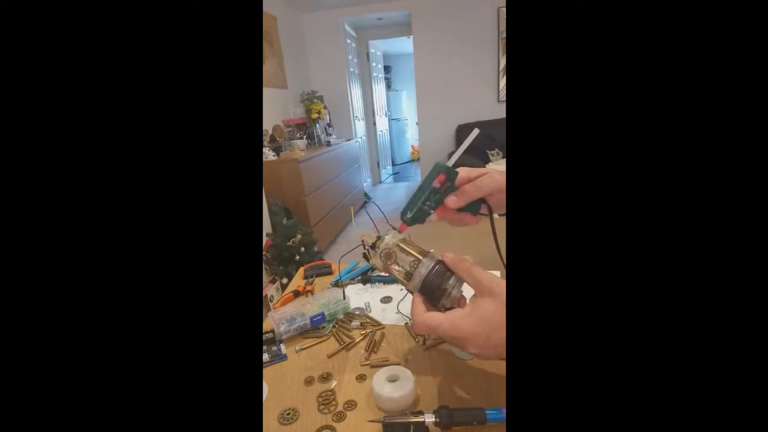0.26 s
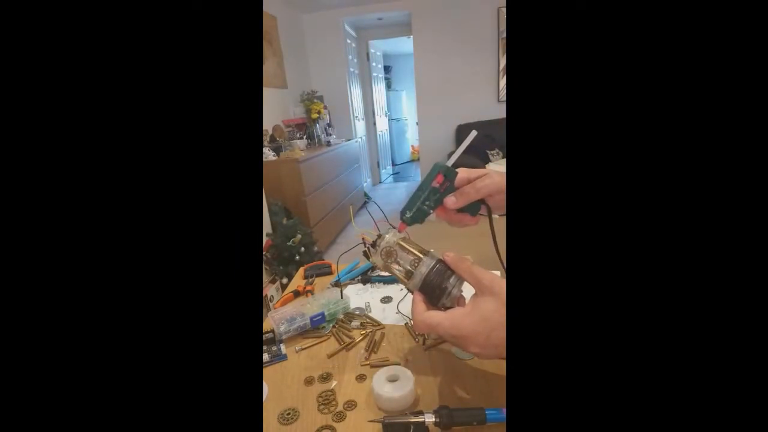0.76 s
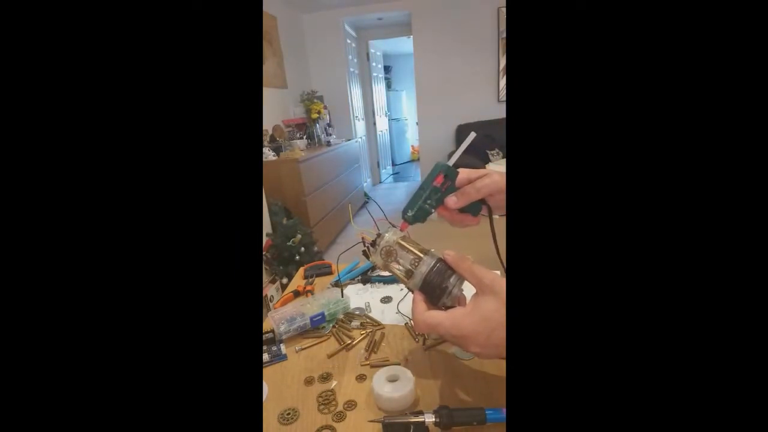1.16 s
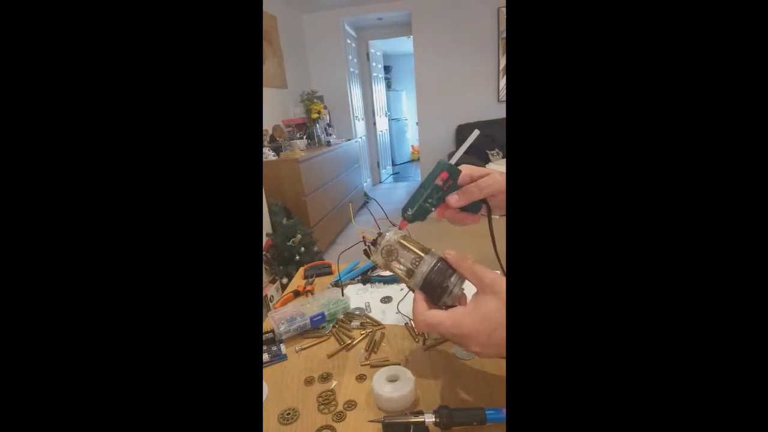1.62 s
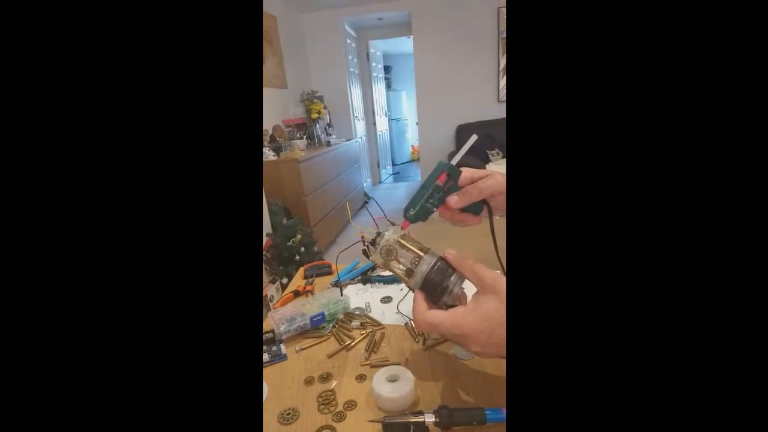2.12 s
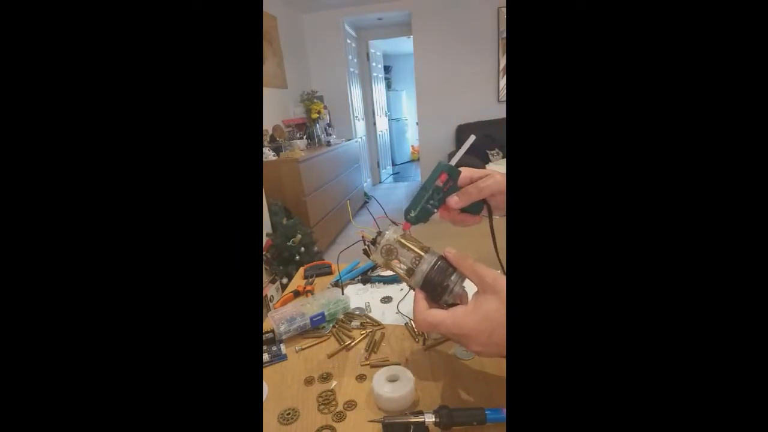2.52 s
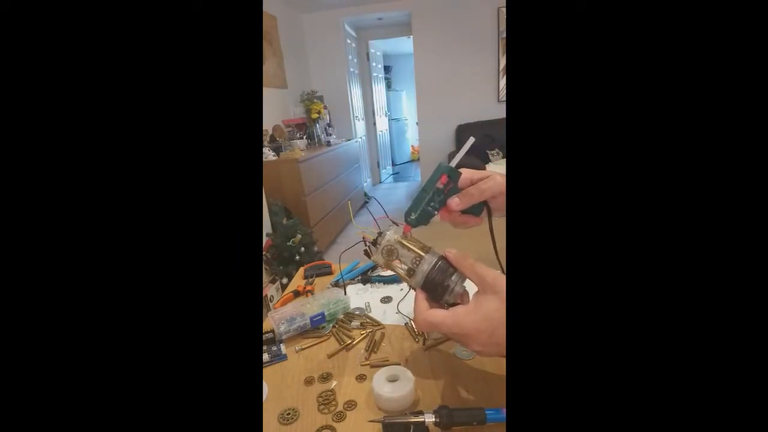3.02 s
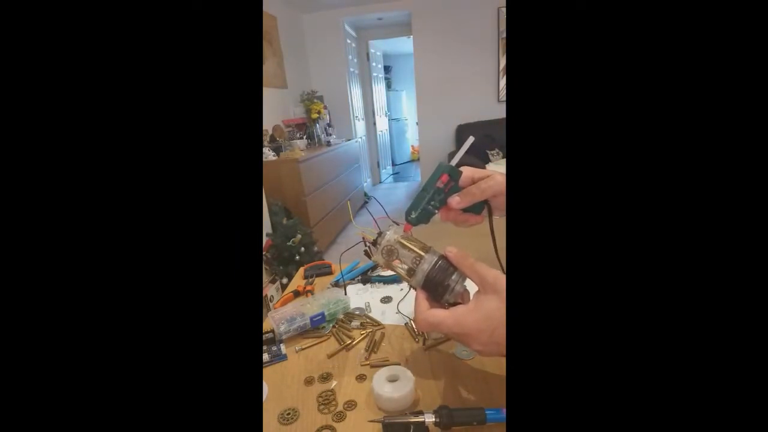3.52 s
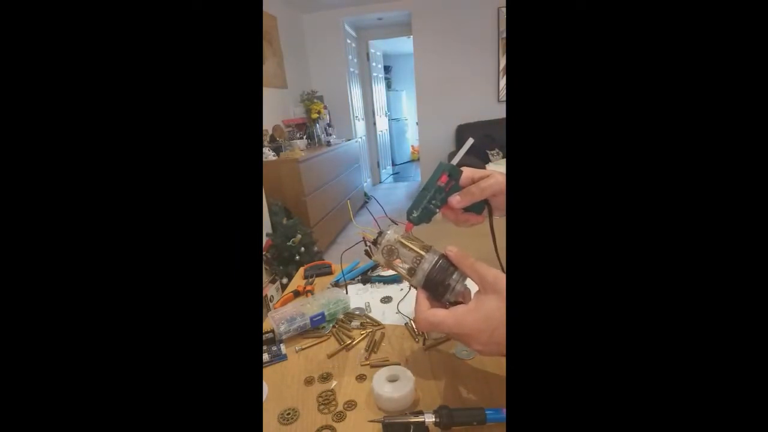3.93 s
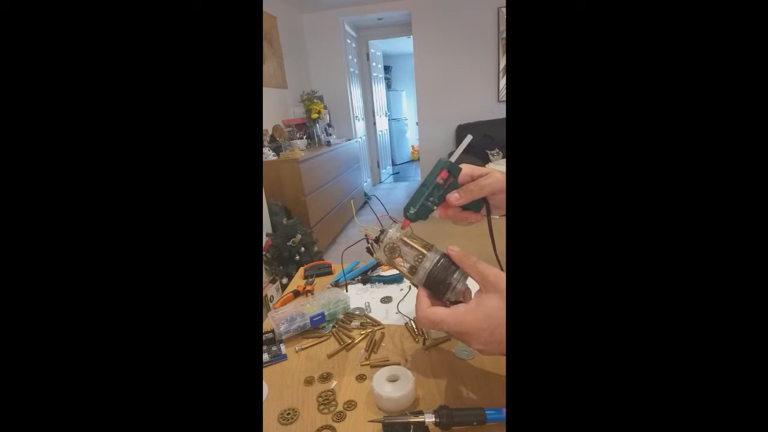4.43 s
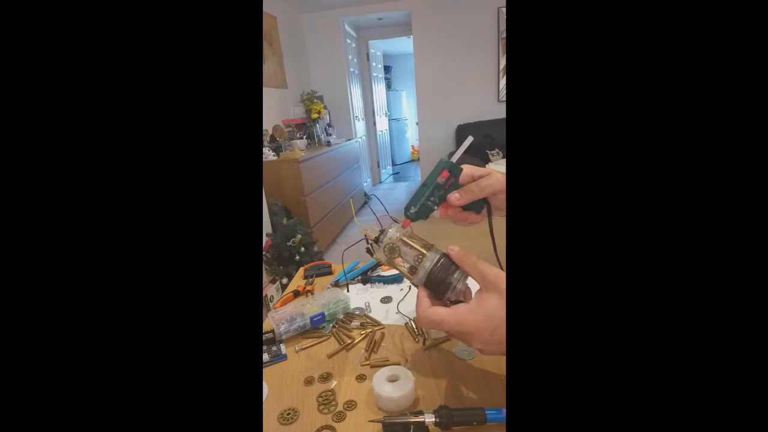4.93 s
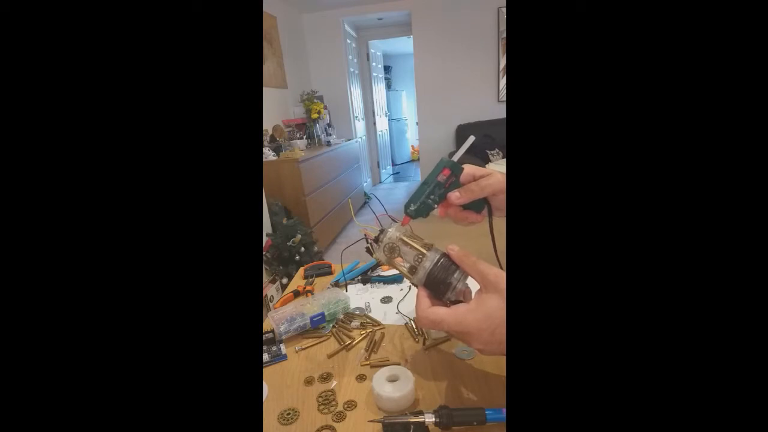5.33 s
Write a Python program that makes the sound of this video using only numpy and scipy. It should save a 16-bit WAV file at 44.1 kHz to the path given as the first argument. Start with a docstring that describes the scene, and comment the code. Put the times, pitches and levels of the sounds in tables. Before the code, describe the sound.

Close, dry, bright creaking and raspy clicking of a squeezed hot glue gun trigger, in seven uneven bursts over a faint quiet room murmur.

```python
"""A quiet room murmurs and a grip settles with two light knocks; then a hot glue gun is squeezed repeatedly.
Its trigger sticks and slips: impulses at a changing rate make scratchy creaks, which break up into single ticks.
Each slip drives damped sines (the plastic shell) and bursts of filtered noise (scratch, hiss, rasp, low body).
Noise bursts make the soft clacks of the trigger let go; sparse echoes add a short room tail in stereo."""
import sys
import numpy as np
from scipy import signal
from scipy.fft import rfft, irfft
from scipy.io import wavfile

SR = 44100
rng = np.random.default_rng(int(sys.argv[2]) if len(sys.argv) > 2 else 0)


def output_pcm(signal):
    """Save a mono or channel-first signal as 16-bit PCM at the path in sys.argv[1].

    Samples are clipped to [-1, 1] before scaling.
    """
    pcm = np.clip(np.atleast_2d(signal).T, -1, 1) * 32767
    wavfile.write(sys.argv[1], SR, np.round(pcm).astype(np.int16))


N = 245630
TIME, HZ = np.arange(N) / SR, np.fft.rfftfreq(N, 1 / SR)

# All noise spectra are relative: colour() or evened() sets their overall power.
# Steady air noise of the room: frequency_hz, relative_density_db
AIR_SPECTRUM = [(25, -15.5), (45, -12.5), (62, -7.5), (82, -6.5), (100, -3.5), (160, 0.5), (310, -7.5),
                (400, -14.5), (700, -14), (1050, -20), (1350, -17.5), (1630, -4.5), (2000, -18.5),
                (2450, -27), (6000, -30), (12500, -29), (15500, -29)]
# Light knocks of the grip settling: start_s, level_db (before the attack), decay_s
GRIP_KNOCKS = [(.0205, -46.5, 0.0074), (.034, -53, 0.007)]
# Spectrum of the grip's knock: frequency_hz, relative_density_db
KNOCK_SPECTRUM = [(700, -23), (1300, -10), (1650, 8.5), (2300, -17), (3000, -23), (3900, -24), (4550, -8),
                  (5100, -16), (6000, -37)]
# Squeezes of the trigger: start_s, full_slip_level_db, extra_rubbing_at_start_db
TRIGGER_SQUEEZES = [(0.201, -34, 13.5), (1.723, -33.5, 17), (2.465, -34, 17.5), (2.955, -35, 18),
                    (3.56, -34.5, 18.5), (4.11, -35.5, 14), (4.589, -34.5, 22)]
# Lone ticks, where the trigger gives once and sticks again: time_s, level_db
LONE_TICKS = [(0.2104, -42.5), (.231, -39), (0.613, -31), (0.8524, -34.5), (1.2592, -43), (2.0305, -34),
              (2.178, -34), (2.6578, -32.5), (2.715, -43), (3.2539, -33.5), (3.7358, -32.5),
              (3.7725, -33.5), (3.8168, -36), (3.8397, -36), (3.8593, -35.5), (4.0266, -39.5),
              (4.1054, -39.5), (4.1257, -35), (4.1424, -34)]
# Creaks, one curve for each unbroken run of sticking and slipping: time_s, rate_slips_per_s
CREAK_RATES = [
    [(0.253, 136.0), (0.317, 117.0), (0.368, 149.0), (0.406, 36.9), (0.468, 50.2), (0.505, 86.5),
     (0.576, 69.4)],
    [(0.67, 47.0), (0.784, 61.8)],
    [(0.887, 14.9), (0.924, 56.1), (0.991, 98.2), (1.101, 60.2), (1.188, 85.3), (1.2, 73.5), (1.254, 64.3)],
    [(1.726, 226), (1.749, 237.0), (1.766, 150), (1.817, 245), (1.903, 94.5), (1.929, 118), (1.961, 61.6),
     (2.006, 69.4)],
    [(2.071, 35.2), (2.095, 53.9), (2.149, 60.4)],
    [(2.464, 191.0), (2.476, 147.0), (2.532, 224.0), (2.576, 149.0), (2.637, 67.2)],
    [(2.953, 212.0), (2.993, 241.0), (3.036, 181.0), (3.102, 46.8), (3.166, 91.4), (3.228, 38.7)],
    [(3.562, 225.0), (3.603, 224.0), (3.608, 282.0), (3.646, 150.0), (3.71, 56.0)],
    [(4.587, 153.0), (4.662, 168.0), (4.667, 271.0), (4.708, 85.1), (4.733, 52.4)],
]
# Strain late in the first squeeze; end values hold outside it: time_s, extra_rubbing_db, groan_gain_db
SHELL_STRAIN = [(.92, -2.5, -36), (1.02, 5.5, -28), (1.25, 11, -19), (1.3, -5, -47.5)]
# Ringing modes of the shell, before detuning: frequency_hz, relative_level_db
SHELL_MODES = [(4560, -5.5), (4850, -2), (5130, -10), (7200, 1), (7740, 4.5), (8190, -1.5), (8450, -6.5),
               (9130, 1.5), (9500, -6), (10880, -7), (12400, -6)]
# Low resonances of the microphone, heard as the body of the creak:
# frequency_hz, width_hz (full, at a quarter of peak amplitude), relative_level_db
BODY_RESONANCES = [(1613, 213, 4.5), (1827, 480, 1.5), (2300, 150, -15)]
# Spectrum of the sliding scratch: frequency_hz, relative_density_db
SCRATCH_SPECTRUM = [(3600, -46), (4100, -21.5), (4500, 11.5), (5100, 9), (5700, 9.5), (6200, 1), (7000, 10),
                    (7750, 11), (8500, 3.5), (9100, 9), (9900, 9.5), (10800, 14), (11500, 10), (13000, -22)]
# Spectrum of the fine friction hiss: frequency_hz, relative_density_db
FIZZ_SPECTRUM = [(5000, -38), (6500, 6.5), (8700, 0), (10500, 7), (11700, -21), (12500, 9), (13500, 7),
                 (14000, 5), (15300, 6), (15800, -16)]
# Middle resonances woken by hard rubbing: frequency_hz, relative_density_db
RASP_SPECTRUM = [(2300, -35.5), (2700, -30), (3000, -23), (3250, -21), (3600, -7), (3950, -23.5),
                 (4350, -4.5), (4650, 3.5), (5000, -5), (5500, -17.5), (6800, -33.5)]
# Note of the strained shell: frequency_hz, relative_density_db
GROAN_SPECTRUM = [(1700, -45), (2050, -7), (2300, 11.5), (2480, -13), (2700, -14.5)]
# Clacks of the trigger easing back: start_s, level_db (before the attack), decay_s
TRIGGER_CLACKS = [(1.3095, -39.5, 0.0075), (2.221, -49, 0.006), (2.2655, -43, 0.012),
                  (2.7555, -37.5, 0.0046), (3.313, -45.5, 0.0031), (3.3765, -44.5, 0.0083),
                  (3.389, -50, 0.018), (4.2405, -53.5, 0.0091), (4.275, -44, 0.0088), (4.289, -51, 0.015),
                  (4.838, -44, 0.014)]
# Spectrum of the trigger's clack: frequency_hz, relative_density_db
CLACK_SPECTRUM = [(1200, -23), (1650, 5), (2400, -25), (3900, -18.5), (4650, 6), (5600, -9.5), (6500, -8),
                  (7500, 9), (8500, -10.5), (9600, -2.5), (11000, -4), (13000, -4), (15500, -20)]
# Reverberation: frequency_hz, t60_s
ROOM_T60 = [(1500, 0.37), (4500, 0.22), (8000, 0.19), (15000, 0.12)]
# Stereo spread: frequency_hz, side_over_mid_db
STEREO_WIDTH = [(60, -17), (160, -40), (600, -24.5), (1200, -27.5), (1700, -20.5), (2050, -11.5),
                (2600, -33), (5500, -87), (7500, -40.5), (9000, -24.5), (10000, -16.5), (11500, -19.5),
                (13000, -23), (15000, -32)]
# Imbalance of the direct channels: frequency_hz, left_over_right_db
STEREO_LEAN = [(1200, 0), (1600, 2), (1900, 4.3), (2250, .3), (9200, 0), (9900, -3), (10500, 0)]

AIR_DB = -66.5  # rms level
SWELL_S, RISE_S, FALL_S = .0024, .0032, .0011  # time to a slip's peak, growth and decay constants
SOFT_START_DB, GRIP_S = -31, 0.021  # a squeeze starts this much softer and takes hold with this time constant
LEAD_S = .003  # a squeeze's settings take over this long before its start
GLIDE_RUB_DB, EASE_S = -8.5, 0.18  # rubbing eases to this level with this time constant
UNEVEN_DB = 0.28  # standard deviation of strength from slip to slip
REST_DB_PER_DOUBLING, USUAL_RATE = -0.04, 66  # per doubling of the wait; reference slips per second
DETUNE = 0.0062  # standard deviation of the shift of each mode, as a share of its frequency
EDGE_HZ = 16000  # lowpass cutoff


def gain_of(db):
    """Level law: decibels are twenty times the logarithm of amplitude."""
    return 10 ** (np.asarray(db) / 20)


def evened(x):
    """Power normalisation: scales to an rms of one."""
    return x / np.sqrt(np.mean(x ** 2) + 1e-20)


def read(points, hz):
    """Interpolation of a spectrum along a logarithmic frequency axis."""
    f, value = np.transpose(points)
    return np.interp(np.log(hz + 1), np.log(f + 1), value)


def colour(x, gain):
    """Minimum-phase filtering: log magnitude fixes phase; white noise keeps its power."""
    log_gain = np.log(np.maximum(evened(gain), 1e-5))
    circle = np.concatenate([log_gain, log_gain[-2:0:-1]])
    transfer = np.exp(np.conj(signal.hilbert(circle)))[:len(HZ)]
    response = irfft(transfer, N)
    return signal.oaconvolve(x, response[:4096])[:N]


def noise(envelope, gain):
    """Source and filter: fresh noise under an envelope rings through a spectrum."""
    return colour(envelope * rng.standard_normal(N), gain)


def shifting(x, response, turns_per_s, count=3):
    """Time-varying convolution: cyclic power-preserving fades among several drawn responses."""
    phases = [turns_per_s * TIME + k / count for k in range(count)]
    weights = np.array([np.maximum(np.cos(2 * np.pi * phase), 0) for phase in phases])
    weights /= np.linalg.norm(weights, axis=0)
    return sum(signal.oaconvolve(x * weight, response())[:N] for weight in weights)


def background(whine_hz=1220, whine_db=-85):
    """Stationary noise: spectrally shaped murmur and hiss, with one faint sinusoidal whine."""
    shaped = irfft(rfft(rng.standard_normal(N)) * gain_of(read(AIR_SPECTRUM, HZ)), N)
    air = gain_of(AIR_DB) * evened(shaped)
    whine = gain_of(whine_db) * np.sqrt(2) * np.sin(2 * np.pi * whine_hz * TIME)
    return air + whine


def rattle(events, spectrum, attack):
    """Impact of loose plastic parts: brief noise bursts with a linear attack and exponential decay."""
    envelope = np.zeros(N)
    for s, db, decay in events:
        onset = np.clip((TIME - s) / attack, 0, 1)
        envelope += gain_of(db) * onset * np.exp(-abs(TIME - s) / decay)
    return noise(envelope, gain_of(read(spectrum, HZ)))


def squeezing():
    """Exponential relaxation: slip level takes hold while hard rubbing eases, both in dB over time."""
    start, full_db, bite_db = np.transpose(TRIGGER_SQUEEZES)
    now = np.maximum(np.searchsorted(start, TIME + LEAD_S) - 1, 0)
    age = np.maximum(TIME - start[now], 0)
    level_db = full_db[now] + SOFT_START_DB * np.exp(-age / GRIP_S)
    rub_db = GLIDE_RUB_DB + bite_db[now] * np.exp(-age / EASE_S)
    return level_db, rub_db


def slip_train(level_db):
    """Stick-slip motion: one impulse a slip, at each whole turn of the integrated rate, plus lone ticks."""
    train = np.zeros(N)
    for curve in CREAK_RATES:
        s, rate = np.transpose(curve)
        turns = np.cumsum(np.interp(TIME, s, rate, left=0, right=0)) / SR
        at = np.flatnonzero(np.diff(np.ceil(turns)))
        # slower slips are very slightly weaker
        rest_db = REST_DB_PER_DOUBLING * np.log2(USUAL_RATE / np.interp(TIME[at], s, rate))
        uneven_db = UNEVEN_DB * rng.standard_normal(len(at))
        train[at] += gain_of(level_db[at] + rest_db + uneven_db)
    for s, db in LONE_TICKS:
        train[round(s * SR)] += gain_of(db)
    return train


def shell_ring(t, slide):
    """Modal excitation: detuned shell modes sound for the length of one slip."""
    modes = 0
    for hz, db in SHELL_MODES:
        shifted_hz = hz * (1 + DETUNE * rng.standard_normal())
        modes = modes + gain_of(db) * np.sin(2 * np.pi * (shifted_hz * t + rng.random()))
    return evened(slide * modes) * np.sqrt(np.mean(slide ** 2))


def spread(blows, shape):
    """Incoherent addition: the energies of blows sum, each following the shape."""
    return np.sqrt(abs(signal.oaconvolve(blows ** 2, shape ** 2)[:N]))


# each *_follow is dB of gain per dB of rubbing
def creak(ring_db=-4.0, ring_follow=0.31, scratch_db=-7.0, scratch_follow=0.4,
          body_db=-16.5, body_follow=0.6, body_decay=0.0029,
          rasp_db=-8.0, rasp_follow=1.01, fizz_db=-6.5, fizz_follow=0.42, brighten=0.74):
    """Friction-driven vibration: each slip gathers speed and stops short, ringing the shell and scratching."""
    level_db, rub_db = squeezing()
    train, t = slip_train(level_db), np.arange(SR // 50) / SR
    strain_s, strain_db, groan_db = np.transpose(SHELL_STRAIN)
    rub_db = rub_db + np.interp(TIME, strain_s, strain_db)
    slide = np.exp(np.minimum((t - SWELL_S) / RISE_S, (SWELL_S - t) / FALL_S))

    # hard rubbing trades the ring for scratch and rasp
    struck = train * gain_of(ring_db - ring_follow * rub_db)
    shell = shifting(struck, lambda: shell_ring(t, slide), turns_per_s=1.7, count=7)
    sliding = spread(train, slide)
    scratch_gain = gain_of(scratch_db + scratch_follow * rub_db)
    scratch = noise(sliding * scratch_gain, gain_of(read(SCRATCH_SPECTRUM, HZ)))
    # weak slips have less fizz, so a run brightens as it swells
    relative_strength = train / np.median(train[train > 0])
    sharp = spread(train * relative_strength ** brighten, slide)
    fizz = noise(sharp * gain_of(fizz_db + fizz_follow * rub_db), gain_of(read(FIZZ_SPECTRUM, HZ)))
    rasp = noise(sliding * gain_of(rasp_db + rasp_follow * rub_db), gain_of(read(RASP_SPECTRUM, HZ)))
    # the body and the groan die away a little more slowly
    hold = np.exp(-t / body_decay)
    held = spread(sliding, hold / np.linalg.norm(hold))
    body_gain = sum(gain_of(db) / (1 + (2 * (HZ - hz) / width) ** 2) ** 2 for hz, width, db in BODY_RESONANCES)
    body = noise(held * gain_of(body_db + body_follow * rub_db), body_gain)
    groan_gain = gain_of(np.interp(TIME, strain_s, groan_db))
    groan = noise(held * groan_gain, gain_of(read(GROAN_SPECTRUM, HZ)))
    return shell + scratch + fizz + rasp + body + groan


def reflections(early_db=-4, early_decay=0.0035, first=0.0018):
    """Reverberation: sparse echoes, stronger early on, decay at a rate set by frequency."""
    t = np.arange(SR // 2) / SR
    signs = rng.choice([-1., 1.], len(t))
    taps = signs * (rng.random(len(t)) < .2) * (t > first)
    taps *= 1 + gain_of(early_db) * np.exp(-t / early_decay)  # early cluster off the table and hands
    hz, when, z = signal.stft(taps, SR, nperseg=256)
    fade = gain_of(-60 * when / read(ROOM_T60, hz)[:, None])
    tail = signal.istft(z * fade, SR, nperseg=256)[1]
    return tail / np.linalg.norm(tail)


def room(x):
    """Moving-source reverberation: the echo pattern drifts as the gun is moved about."""
    return shifting(x, reflections, turns_per_s=1.1)


def microphones(mid):
    """Mid-side stereo: a frequency-dependent imbalance, plus reverberant sound of opposite sign in each channel."""
    side = rfft(room(mid)) * gain_of(read(STEREO_WIDTH, HZ))
    lean = gain_of(read(STEREO_LEAN, HZ) / 2)
    left = rfft(mid) * lean + side
    right = rfft(mid) / lean - side
    return irfft(np.array([left, right]), N)


def scene(creak_room_db=-4.0, clack_room_db=-1, knock_room_db=-6):
    """Superposition: direct sounds, their reverberation and the room's background add."""
    air = background()
    knocks = rattle(GRIP_KNOCKS, KNOCK_SPECTRUM, attack=0.00039)
    creaks = creak()
    clacks = rattle(TRIGGER_CLACKS, CLACK_SPECTRUM, attack=0.0031)
    sent = gain_of(creak_room_db) * creaks + gain_of(clack_room_db) * clacks + gain_of(knock_room_db) * knocks
    return microphones(creaks + clacks + knocks + room(sent) + air)


def record(dry):
    """Band limitation: a linear-phase lowpass filter removes the highest frequencies."""
    lowpass = signal.firwin(255, EDGE_HZ, window=("kaiser", 8), fs=SR)
    return signal.oaconvolve(dry, lowpass[None], "same")


dry = scene()
out = record(dry)
output_pcm(out)
```